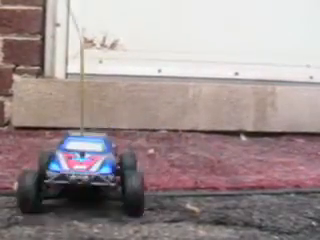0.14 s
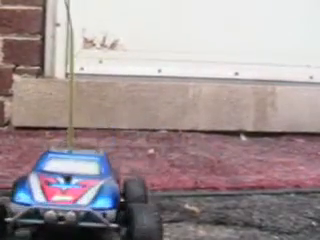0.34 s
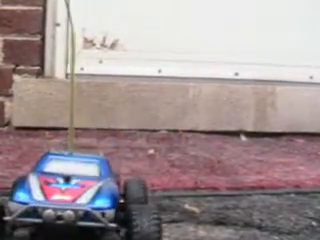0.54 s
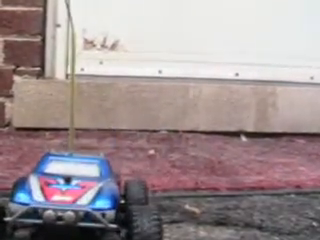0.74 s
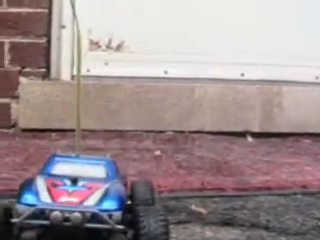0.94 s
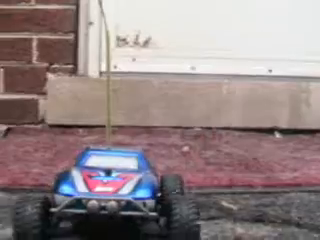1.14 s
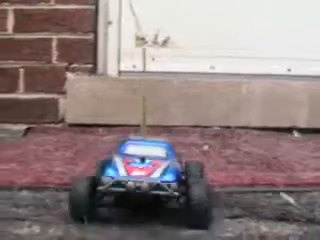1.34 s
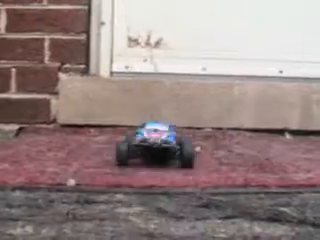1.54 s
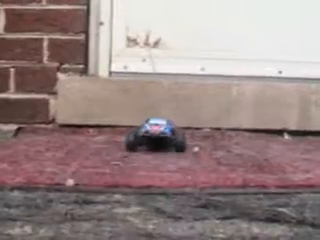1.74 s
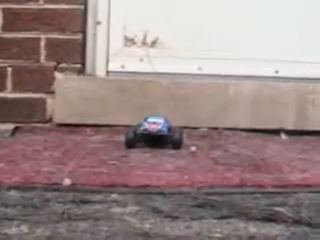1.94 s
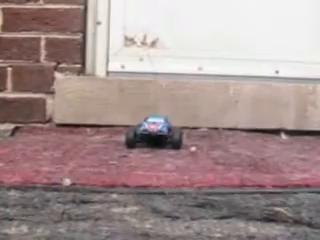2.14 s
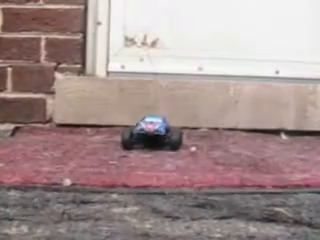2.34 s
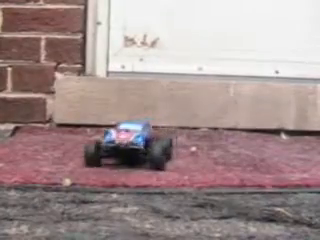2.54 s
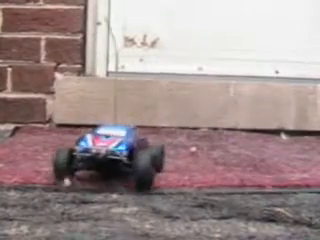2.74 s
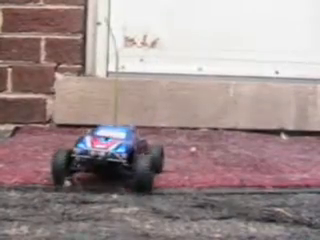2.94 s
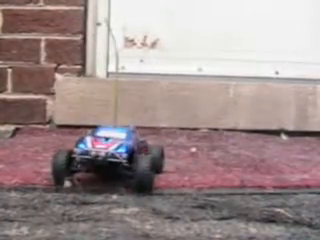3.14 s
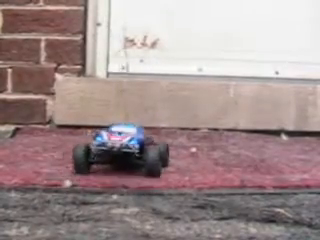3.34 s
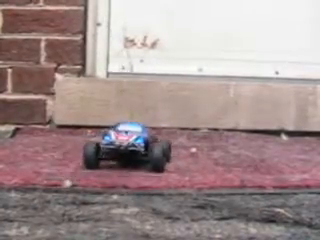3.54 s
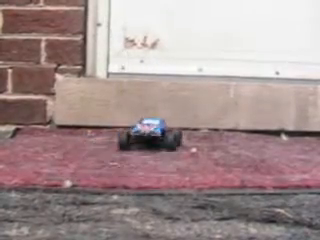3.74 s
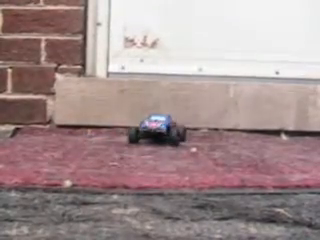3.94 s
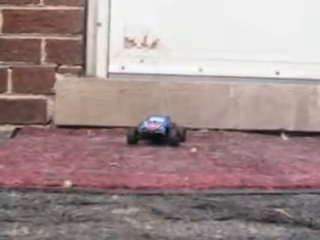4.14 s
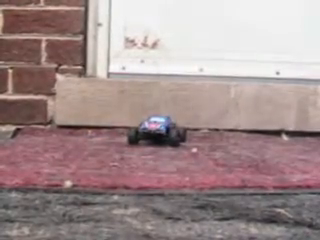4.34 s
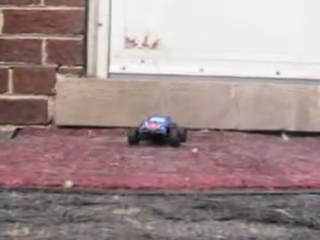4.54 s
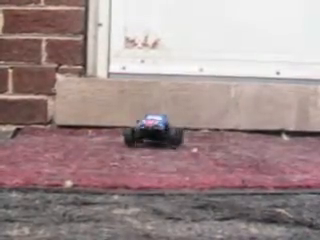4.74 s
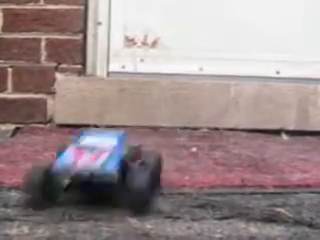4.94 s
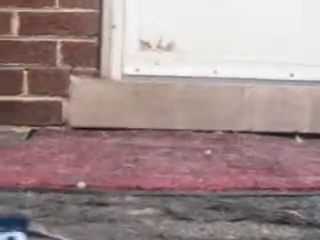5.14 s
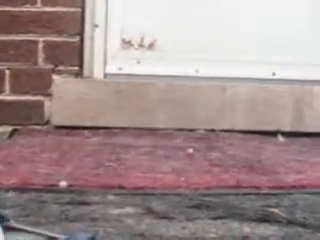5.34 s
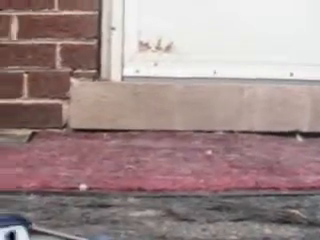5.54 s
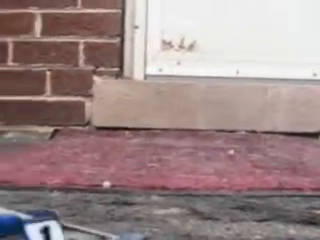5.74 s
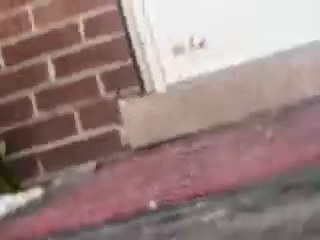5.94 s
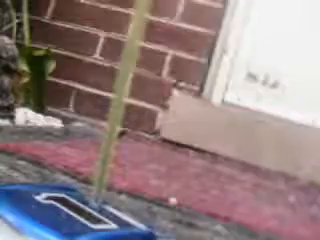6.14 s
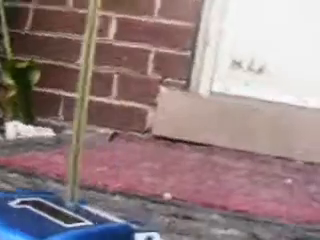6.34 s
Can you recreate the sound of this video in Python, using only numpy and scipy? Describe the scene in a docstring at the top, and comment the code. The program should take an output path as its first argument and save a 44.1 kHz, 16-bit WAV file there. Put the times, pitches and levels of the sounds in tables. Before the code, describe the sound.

Toy truck motor zips and buzzes back and forth outdoors, knocking into a step twice, before a loud plastic crash and jostling thuds.

```python
"""A toy truck rolls with a dry rattle and crunch in quiet outdoor air, then is blipped back and forth.
Radio-controlled, before a doorstep: chopped motor current buzzes as partials, gear teeth whine at their
meshing rate, and random contacts excite resonances for the rattle and the crunching tyres.
It backs into the step twice, then runs up and crashes beside a pocket camera, which is then jostled:
these blows are decaying modes under a burst of noise. A sample-and-hold mirrors all into the treble."""
import sys
import numpy as np
from scipy import signal
from scipy.fft import rfft, irfft, next_fast_len
from scipy.io import wavfile
from scipy.ndimage import uniform_filter1d

SR = 44100
rng = np.random.default_rng(int(sys.argv[2]) if len(sys.argv) > 2 else 0)


def unload_audio(sound):
    """Save the sound as a 16-bit wav file, at the path given as the first command line argument."""
    columns = np.transpose(np.atleast_2d(sound))
    # keep every value between -1 and 1, then stretch to whole-number steps
    steps = np.round(np.clip(columns, -1, 1) * 32767)
    wavfile.write(sys.argv[1], SR, steps.astype(np.int16))


N = 281351

# relative spectrum of small plastic parts and brushes: (frequency [Hz], density [dB])
RATTLE_SPECTRUM = [(200, 6), (900, -11), (1600, 9), (2100, 3), (2550, -28), (3000, 15), (3450, 1.5),
                   (4000, 10), (4700, 2), (5400, -10), (6400, -12), (8000, 4.5)]
# motor revs: (on [s], off [s], tooth rate approached [Hz], run-down time constant [s],
# gears loaded from [s], until [s], whine under load before gearbox response [dB],
# whine at start of run-down before response [dB], tight spot of spur gear meets pinion [s],
# throb depth [dB])
MOTOR_REVS = [(-0.3, -0.025, 5300, .06, -0.1, -0.025, -19, -16.5, 0.008, 10),
              (1.344, 1.563, 5350, .06, 1.364, 1.41, -11.5, -21, 1.391, 18),
              (1.57, 1.708, 3080, .06, 1.69, 1.706, -25, -40, 1.703, 6),
              (2.37, 2.503, 2330, .1, 2.48, 2.503, -19, -20, 2.483, 3),
              (3.6, 3.767, 5350, .06, 3.645, 3.665, -14.5, -23, 3.646, 17),
              (3.8, 3.898, 3580, .06, 3.888, 3.898, -27, -40, 3.895, 5),
              (4.836, 5.004, 5450, .112, 4.896, 5.004, -14, -16, 4.913, 8)]


def from_db(db):
    """Level is logarithmic: 20 dB is a factor of ten in amplitude."""
    return 10 ** (np.asarray(db) / 20)


def rms_one(x):
    """Normalise the mean-square value, that is, to unit power."""
    return x / np.sqrt(np.mean(x ** 2) + 1e-20)


def seconds(size=N):
    """Uniform sampling gives a time axis in seconds."""
    return np.arange(size) / SR


def coloured(x, spectrum):
    """Linear filtering by a level curve over log frequency; the result has unit power."""
    hz, db = np.transpose(spectrum)
    size = next_fast_len(len(x))
    f = np.fft.rfftfreq(size, 1 / SR) + 1
    gain = from_db(np.interp(np.log(f), np.log(hz), db))
    return rms_one(irfft(rfft(x, size) * gain, size)[:len(x)])


def drift(rate_hz):
    """Band-limited noise: smooth chance with an rms of one."""
    sos = signal.butter(2, rate_hz, fs=SR, output="sos")
    slow = signal.sosfilt(sos, rng.standard_normal(N + SR))
    # drop the filter's first second, while it settles
    return rms_one(slow[SR:])


def low_pass(x, hz, order=2):
    """A Butterworth filter attenuates what lies above its cutoff."""
    return signal.sosfilt(signal.butter(order, min(hz, SR / 3), fs=SR, output="sos"), x)


def dying(t, t60):
    """Exponential decay: amplitude falls by 60 dB in t60 seconds."""
    return np.exp(-np.log(1000) * t / t60)


def swell(full, end, attack_s, release_s):
    """Envelope: rises to one at `full`, holds until `end`, then falls to nothing along a power curve."""
    t, curve = seconds(), 1.91
    rise = 1 + (t - full) / attack_s
    fall = 1 - (t - end) / release_s
    return np.clip(np.minimum(rise, fall), 0, 1) ** curve


def add(out, s, sound):
    """Superposition: mix a sound in at a time."""
    at = int(np.clip(s * SR, 0, N - 1))
    out[at:at + len(sound)] += sound[:N - at]


def grains(per_s, spread_db):
    """A random point process: clicks of either sign and uneven size."""
    present = rng.random(N) < per_s / SR
    sign = rng.choice([-1, 1], N)
    size_db = spread_db * np.minimum(rng.exponential(1, N), 4)
    return present * sign * from_db(size_db)


def ring(clicks, hz, t60):
    """Impulse response of a damped resonator: a unit click starts a sine of height one."""
    r, w = dying(1 / SR, t60), 2 * np.pi * hz / SR
    return signal.lfilter([0, np.sin(w)], [1, -2 * r * np.cos(w), r * r], clicks + 1e-18)


def chatter(clicks, low_hz, high_hz, t60, count):
    """Impact excitation: each click rings one of many small resonances; unit power."""
    dealt = rng.integers(0, count, N)
    rings = np.zeros(N)
    for k, hz in enumerate(np.geomspace(low_hz, high_hz, count)):
        rings += ring(clicks * (dealt == k), hz, t60)
    # small parts radiate little below their resonances
    return rms_one(low_pass(np.diff(rings, prepend=0), 3610, order=4))


def blow(modes, bright_hz, crack_t60, crack_db):
    """Modal excitation: a struck plastic body rings under a clatter; unit power over the first 10 ms."""
    # relative spectrum of the clatter: (frequency [Hz], density [dB])
    crack_spectrum = [(60, -17), (200, -10), (450, 1.5), (1100, 1), (2200, -6), (3200, -5), (4200, -6),
                      (6000, -4), (8000, -2.5)]
    mode_spread_db = 2  # no two blows excite the modes alike
    t = seconds(SR // 3)
    ringing = np.zeros(len(t))
    for k, (hz, db, t60) in enumerate(modes):
        gain = (-1) ** k * from_db(db + rng.normal(0, mode_spread_db))
        ringing += gain * np.sin(2 * np.pi * hz * t) * dying(t, t60)
    noise = coloured(rng.standard_normal(len(t)), crack_spectrum)
    crack = from_db(crack_db) * noise * dying(t, crack_t60)
    # the longer a contact scuffs, the more softly it starts
    onset = 1 - np.exp(-t / (0.0063 * crack_t60))
    hit = low_pass(ringing + crack, bright_hz) * onset
    return hit / np.sqrt(np.mean(hit[:SR // 100] ** 2))


def outdoors():
    """Broadband noise and wavering sinusoids: far town rumble and the hum of distant machines."""
    # relative spectrum of the rumble: (frequency [Hz], density [dB])
    air_spectrum = [(20, -56), (40, -16), (60, 5.5), (85, -8), (150, 1), (240, -0.5), (400, -6.5),
                    (800, -9.5), (1500, -15.5), (2200, -21.5), (3200, -28.5), (4500, -34.5), (6000, -40.5),
                    (8000, -39.5)]
    # distant machine hum: (frequency [Hz], median level [dB])
    hum_tones = [(56.2, -52), (119.5, -49)]
    air_db = -39
    hum = np.zeros(N)
    for hz, db in hum_tones:
        gain = np.sqrt(2) * from_db(db + 3.16 * drift(2.1))
        hum += gain * np.sin(2 * np.pi * hz * seconds() + 0.33 * drift(7.1))
    return from_db(air_db) * coloured(rng.standard_normal(N), air_spectrum) + hum


def house_wall(x):
    """Diffuse reflection: door, step and bricks scatter a short dull tail after the sound."""
    t = seconds(SR // 2)
    tail = low_pass(rng.standard_normal(len(t)), 6700) * dying(t, t60=0.23) * (t > .005)
    return signal.fftconvolve(x, tail / np.sqrt(np.sum(tail ** 2)))[:N]


def bumps():
    """Modal ringing of a case at close contacts; the first, the crash, also excites low booming modes."""
    # crash and jostling of the camera: (time [s], level [dB], brightness [Hz], clatter t60 [s])
    contacts = [(5.192, -8.5, 2400, 0.047), (5.197, -16.5, 2060, 0.098), (5.623, -38.5, 1500, 0.032),
                (5.843, -26, 910, 0.049), (5.891, -20, 2900, 0.01), (5.899, -18, 2110, 0.021),
                (5.955, -34.5, 1500, 0.2), (5.998, -24.5, 2270, 0.1), (6.02, -22.5, 1920, 0.13),
                (6.028, -25.5, 2980, 0.038), (6.041, -32.5, 1850, 0.25), (6.077, -35, 1480, 0.15),
                (6.129, -28.5, 1500, 0.074), (6.137, -13, 2000, 0.046), (6.148, -13.5, 2470, 0.073),
                (6.211, -15.5, 2130, 0.016), (6.314, -24, 1530, 0.08), (6.344, -23, 895, 0.049),
                (6.357, -23, 1010, 0.1)]
    # case modes: (frequency [Hz], relative level [dB], t60 [s])
    case_modes = [(384, -14, 0.056), (534, -10, 0.065), (737, -5, 0.045), (1024, -3, 0.039),
                  (1280, 5.5, 0.021), (1900, 2, 0.0073)]
    # ground and camera mount under the crash: (frequency [Hz], level [dB], t60 [s])
    boom_modes = [(163, -27, 0.16), (238.5, -20.5, 0.19), (362, -5, 0.036), (544, -8.5, 0.051)]
    # faint tones ring on after jolts: (time [s], frequency [Hz], level [dB], t60 [s])
    pings = [(2.51, 737, -45, 2.2), (5.192, 900, -41.5, 1.6), (6.076, 899, -30.5, .3), (6.136, 893, -30, 2)]
    out, t = np.zeros(N), seconds(SR)
    for s, db, bright_hz, t60 in contacts:
        add(out, s, from_db(db) * blow(case_modes, bright_hz, crack_t60=t60, crack_db=12))
    crash_s = contacts[0][0]
    for hz, db, t60 in boom_modes:
        add(out, crash_s, from_db(db) * np.sin(2 * np.pi * hz * t) * dying(t, t60))
    for s, hz, db, t60 in pings:
        add(out, s, from_db(db) * np.sin(2 * np.pi * hz * t) * dying(t, t60))
    return out


def knocks():
    """Impacts excite modes of chassis and gearbox; hopping wheels give a low damped thump."""
    # chassis knocks on ground and step: (time [s], level [dB], brightness [Hz])
    chassis_hits = [(0.47, -33.5, 3150), (0.8, -34, 2600), (1.262, -29, 3700), (1.389, -28.5, 3000),
                    (1.45, -32, 1250), (1.467, -38, 1250), (2.218, -20, 2620), (2.87, -35, 1960),
                    (3.001, -36, 3000), (3.203, -38, 3160), (3.992, -45.5, 3000), (4.638, -22, 2500),
                    (5.301, -28, 2540)]
    # gear teeth take up their slack: (time [s], level [dB])
    gear_ticks = [(0.003, -20.5), (0.175, -26), (0.296, -28), (0.514, -40), (1.835, -45), (2.869, -36),
                  (3.436, -44.5), (3.463, -41)]
    # wheels hop on the last run: (time [s], level [dB])
    wheel_hops = [(4.901, -26.5), (5.01, -43)]
    # body modes: (frequency [Hz], relative level [dB], t60 [s])
    chassis_modes = [(495, -8.5, 0.11), (743, -6, 0.055), (853, -3.5, 0.041), (877, -7.5, .06),
                     (1090, -4.5, 0.032), (1660, -4, 0.023), (1863, -13.5, 0.086), (2125, -3.5, 0.026)]
    gearbox_modes = [(1980, -12, 0.017), (2974, -1.5, 0.021), (3420, -14, 0.039), (4170, -5.5, 0.0091)]
    out, t = np.zeros(N), seconds(SR // 3)
    for s, db, bright_hz in chassis_hits:
        add(out, s, from_db(db) * blow(chassis_modes, bright_hz, crack_t60=0.053, crack_db=-2))
    for s, db in gear_ticks:
        add(out, s, from_db(db) * blow(gearbox_modes, bright_hz=6000, crack_t60=0.07, crack_db=-11.0))
    for s, db in wheel_hops:
        add(out, s, from_db(db) * np.sin(2 * np.pi * 45 * t) * dying(t, t60=0.098))
    return out


def effort():
    """Incoherent sources add in power: pulling, coasting and rough ground set rattle and tyre gains."""
    # pulls under power: (full [s], end [s], build-up [s], gear rattle [dB], tyres [dB])
    pulls = [(1.36, 1.589, 0.11, -25.5, -28.5), (2.484, 2.5, .13, -29.5, -37.5),
             (3.344, 3.372, 0.1, -36.5, -36.5), (3.653, 3.785, .11, -26.5, -32),
             (4.785, 4.88, .02, -30.5, -41), (4.871, 5.187, 0.048, -27, -37)]
    # free rolling: (start [s], stop [s], gear rattle [dB], tyres [dB], slowing [dB/s])
    coasts = [(0, 0.36, -36, -38, 1), (1.662, 1.893, -32.5, -39.5, 52.5), (2.557, 2.78, -41.5, -41.5, 12.5),
              (3.84, 3.999, -35, -42.5, 31)]
    # tyres crunch over rough ground: (peak [s], level [dB], swell [s], fade [s])
    crunches = [(0.003, -27.5, .05, 0.032), (0.345, -34.5, 0.31, 0.11), (1.462, -20, 0.26, 0.15),
                (3.72, -26.5, 0.22, 0.12), (3.998, -30.5, 0.044, 0.04), (5.185, -15, 0.15, 0.064),
                (5.265, -29.5, 0.073, 0.026)]
    gear_power, tyre_power = np.zeros(N), np.zeros(N)
    for full, end, build_s, rattle_db, tyre_db in pulls:
        shape = swell(full, end, build_s, release_s=.08)
        gear_power += (from_db(rattle_db) * shape) ** 2
        tyre_power += (from_db(tyre_db) * shape) ** 2
    for start, stop, rattle_db, tyre_db, slowing in coasts:
        slowed_db = -slowing * np.clip(seconds() - start, 0, stop - start)
        shape = swell(start, stop, attack_s=0.05, release_s=0.14) * from_db(slowed_db)
        gear_power += (from_db(rattle_db) * shape) ** 2
        tyre_power += (from_db(tyre_db) * shape) ** 2
    for s, db, swell_s, fade_s in crunches:
        tyre_power += (from_db(db) * swell(s, s, swell_s, fade_s)) ** 2
    return np.sqrt(gear_power), np.sqrt(tyre_power)


def rolling(throb):
    """Random impacts: teeth and drive shafts rattle; treads slap the gritty ground and drum the shell."""
    # relative spectrum of the tread noise: (frequency [Hz], density [dB])
    tyre_spectrum = [(40, -40), (150, -38), (400, -8.5), (700, -4.5), (1020, 2.5), (1300, -3.5),
                     (1600, 0.5), (2200, -1.5), (3200, -16), (5000, -12), (8000, -33)]
    gear_gain, tyre_gain = effort()
    rasp_grains = grains(3000, spread_db=0.5) * from_db(1.2 * drift(73) + throb)
    rasp = coloured(rasp_grains, RATTLE_SPECTRUM)
    clack_grains = grains(420, spread_db=2) * from_db(2 * throb)
    clacks = chatter(clack_grains, 1900, 4700, t60=.028, count=26)
    tread_grains = grains(2400, spread_db=1.5) * from_db(2 * drift(60))
    tyres = coloured(tread_grains, tyre_spectrum)
    shell = chatter(grains(500, spread_db=2), 920, 1400, t60=.028, count=10)
    gears = rasp + from_db(-3) * clacks
    wheels = tyres + from_db(-6.0) * shell
    return gear_gain * gears + tyre_gain * wheels


def controller_buzz():
    """Periodic current pulses force the motor can at harmonics; turning brushes make each flutter."""
    # part throttle, current chopped: (start [s], end [s], first level [dB], last level [dB]),
    # before the inrush boost
    throttle = [(1.105, 1.16, -33.5, -32), (1.291, 1.347, -34.5, -38), (2.388, 2.49, -38, -36),
                (3.233, 3.389, -38, -37), (3.562, 3.656, -37, -44), (4.765, 4.855, -40, -61)]
    # relative median level of each multiple of the chopping rate [dB]
    partials_db = [-11, 0, -1.5, -8, -22, -20, -25]
    chop_hz, brushes_db = 992, -3
    # a stalled motor draws extra current as the throttle opens
    inrush_share, inrush_t60_s = .6, 0.16
    t, level = seconds(), np.zeros(N)
    for start, end, first_db, last_db in throttle:
        inrush = 1 + inrush_share * dying(np.maximum(t - start, 0), inrush_t60_s)
        gain = from_db(np.interp(t, [start, end], [first_db, last_db]))
        level += (t > start) * (t < end) * inrush * gain
    phase = 2 * np.pi * np.cumsum(chop_hz * (1 + .004 * drift(70))) / SR
    tone = np.zeros(N)
    for k, db in enumerate(partials_db, 1):
        tone += from_db(db + 2.8 * drift(160)) * np.sin(k * phase + .55 * drift(220))
    # sparking brushes add noise to the tone
    brushes = from_db(brushes_db) * coloured(grains(2500, spread_db=3), RATTLE_SPECTRUM)
    return low_pass(level, 250) * (rms_one(tone) + brushes)


def motor():
    """First-order speed response: exponential spin-up and run-down; gives tooth rate, whine dB, rev index."""
    # gearbox radiation of each tooth rate: (frequency [Hz], gain [dB])
    whine_response = [(1200, -70), (1650, -17), (2070, -3), (2500, -13), (3030, 0), (3400, -6), (3850, 0),
                      (4400, -3), (5200, -10)]
    # tyres bite and drag the motor down: (time [s], peak share of speed lost)
    bites = [(4.929, .14), (4.957, .15)]
    bite_s, spin_up_s, rolling_hz = .012, .055, 1200
    slack_db = -17  # slack gears whine far less
    run_down_db_per_s = 70
    t = seconds()
    speeds = []
    for on, off, top_hz, run_down_s, *_ in MOTOR_REVS:
        spin_up = 1 - np.exp(-np.clip(t - on, 0, off - on) / spin_up_s)
        run_down = np.exp(-np.maximum(t - off, 0) / run_down_s)
        speeds.append(top_hz * spin_up * run_down)
    # the fastest rev is in charge
    rev = np.argmax(speeds, axis=0)
    drag = sum(share * np.exp(-((t - s) / bite_s) ** 2) for s, share in bites)
    hz = np.maximum(np.max(speeds, axis=0) * (1 - drag), rolling_hz)
    _, off, _, _, loaded, unloaded, load_db, run_down_db, _, _ = np.array(MOTOR_REVS)[rev].T
    load = swell(loaded, unloaded, attack_s=.04, release_s=.025)
    driven_db = load_db + slack_db * (1 - load)
    free_db = run_down_db - run_down_db_per_s * (t - off)
    radiated_db = np.interp(hz, *np.transpose(whine_response))
    db = np.where(t < off, driven_db, free_db) + radiated_db
    return hz, uniform_filter1d(db, size=200), rev


def spur_throb(hz, rev):
    """Eccentric mesh: it tightens (+1) and loosens (-1) once per spur gear turn, dipping the whine [dB]."""
    spur_teeth = 56
    turns = np.cumsum(hz) / SR / spur_teeth
    *_, spots, depth_db = np.transpose(MOTOR_REVS)
    tight_turn = np.interp(spots, seconds(), turns)[rev]
    throb = np.cos(2 * np.pi * (turns - tight_turn))
    return throb, depth_db[rev] * (throb - 1) / 2


def gear_whine(hz, db):
    """Meshing tone at the tooth rate: uneven teeth roughen the line by phase noise and add other orders."""
    phase = 2 * np.pi * np.cumsum(hz * (1 + .014 * drift(120))) / SR + .38 * drift(500)
    tone = np.sin(phase) + from_db(-24.5) * np.sin(2 * phase)
    for multiple in (1 / 2, 2 / 3):
        tone += from_db(-39.0 + 2 * drift(70)) * np.sin(multiple * phase + drift(160))
    for multiple, order_db in ((3 / 2, -7), (2, -1)):
        # the gearbox radiates higher orders mainly near 4 kHz
        radiated = np.exp(-((multiple * hz - 4120) / 450) ** 2)
        tone += from_db(order_db) * radiated * np.sin(multiple * phase)
    return np.sqrt(2) * from_db(db + drift(130)) * tone


def scene():
    """Superposition of the truck, its scattered echo and the outdoor air."""
    hz, whine_db, rev = motor()
    throb, dip_db = spur_throb(hz, rev)
    whine = gear_whine(hz, whine_db + dip_db)
    truck = bumps() + knocks() + rolling(throb) + controller_buzz() + whine
    return (outdoors() + from_db(-19) * house_wall(truck) + truck)[None]


def record(dry):
    """Sample-and-hold imaging: the camera clips, samples slowly and mirrors the sound into the treble."""
    hold_hz, alias_guard_hz, cutoff_hz = 16000, 7650, 12800
    heard = low_pass(np.clip(dry, -1, 1), alias_guard_hz, order=12)
    # each mirror image stands 2.5 dB above its source before the hold
    mirrored = heard * (1 + 2 * from_db(2.5) * np.cos(2 * np.pi * hold_hz * seconds()))
    size = next_fast_len(N)
    # holding each sample weights the spectrum by a sinc
    hold_gain = np.sinc(np.fft.rfftfreq(size, 1 / SR) / hold_hz)
    held = irfft(rfft(mirrored, size) * hold_gain, size)[:, :N]
    return signal.sosfilt(signal.ellip(12, .2, 80, cutoff_hz, fs=SR, output="sos"), held)


dry = scene()
out = record(dry)
unload_audio(out)
```